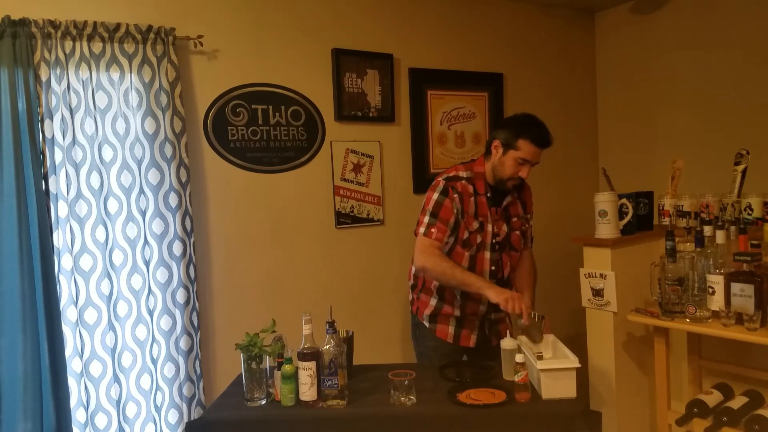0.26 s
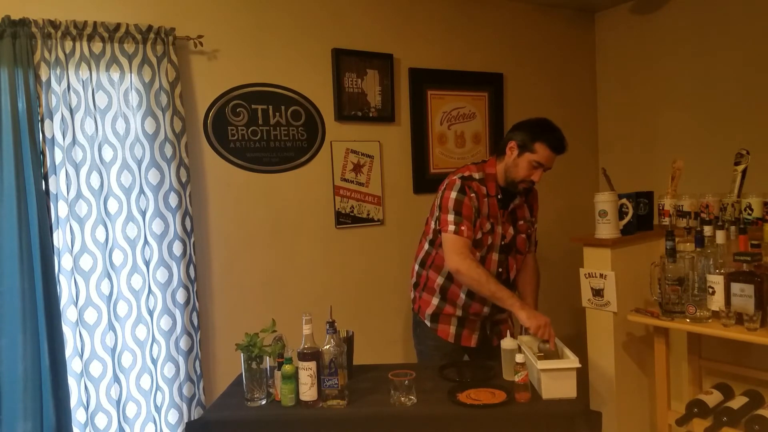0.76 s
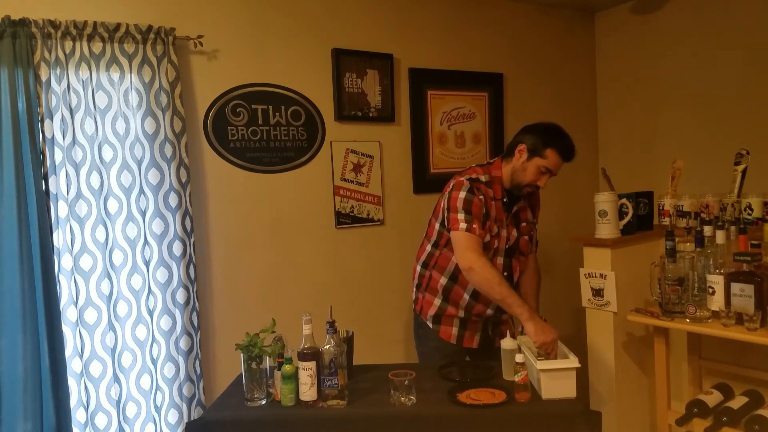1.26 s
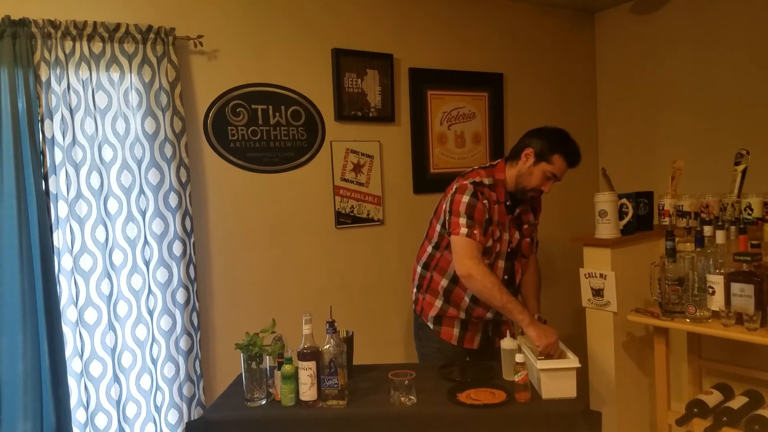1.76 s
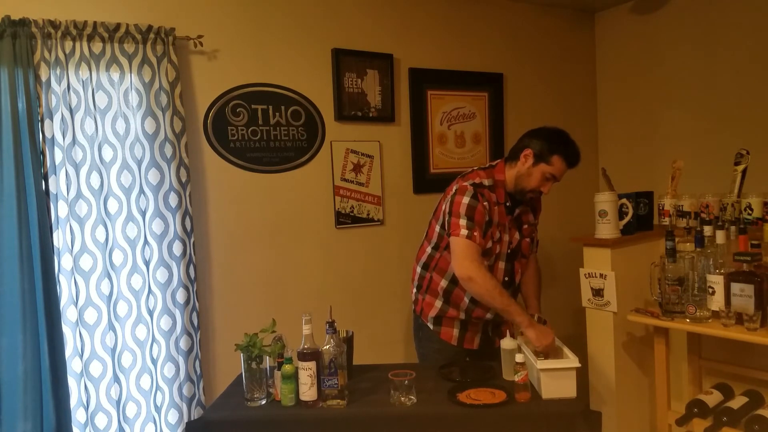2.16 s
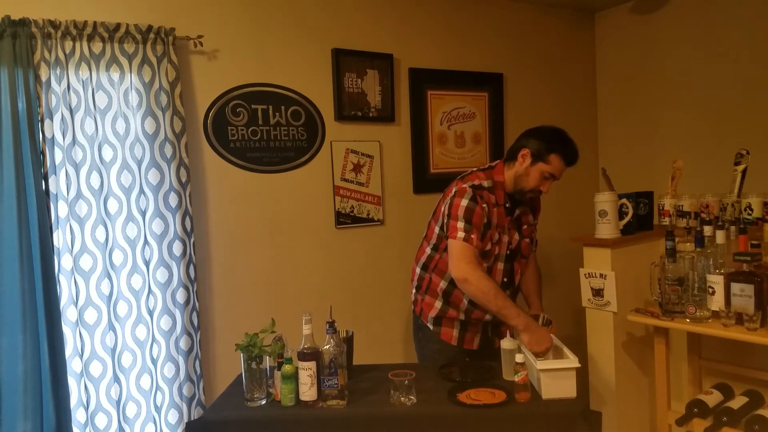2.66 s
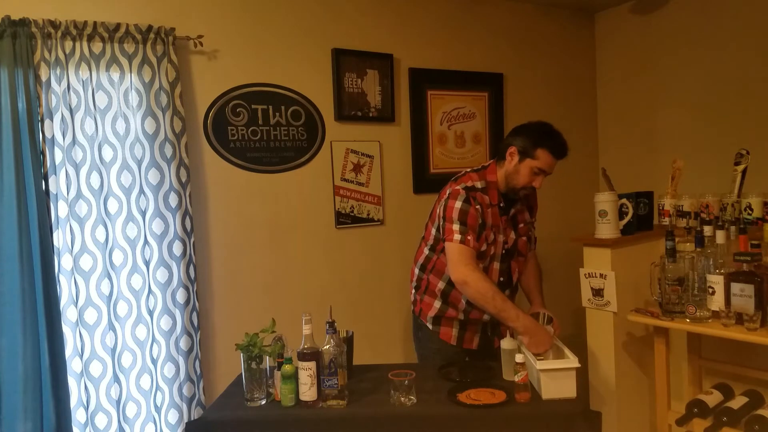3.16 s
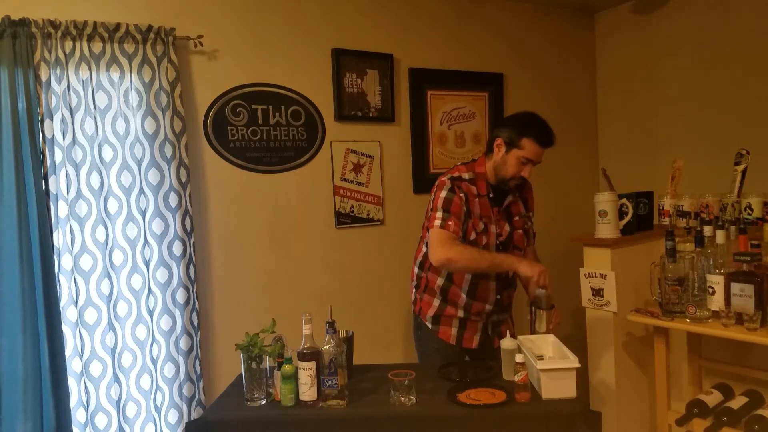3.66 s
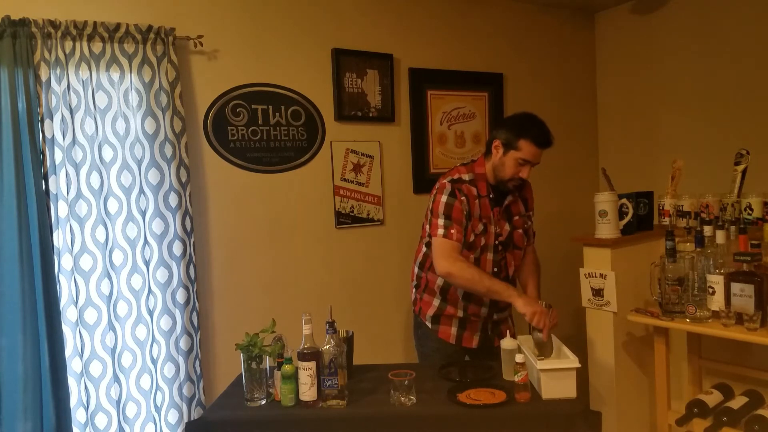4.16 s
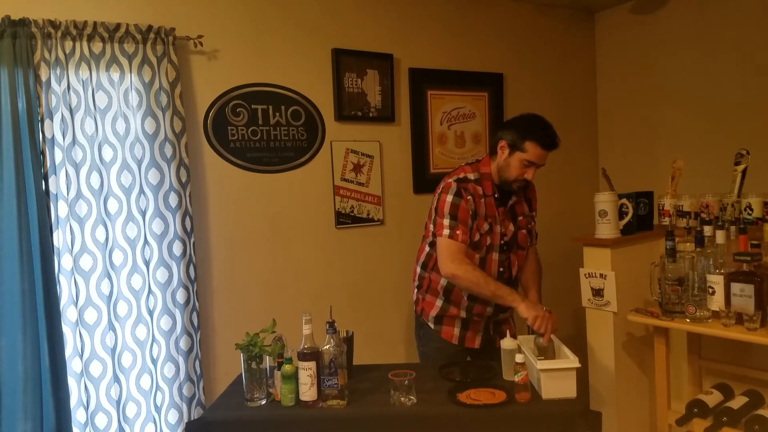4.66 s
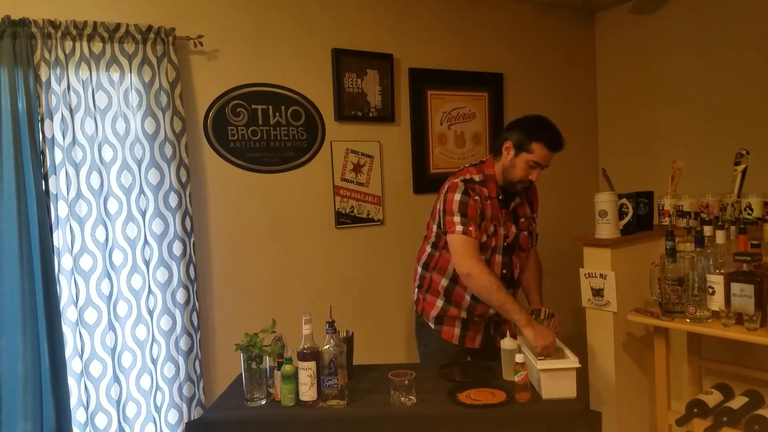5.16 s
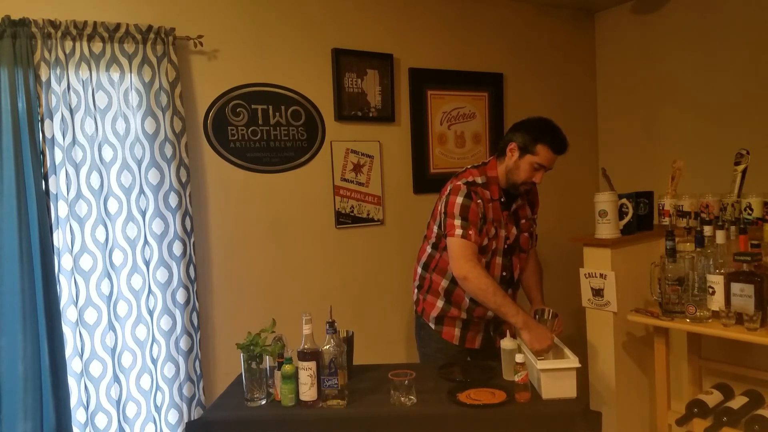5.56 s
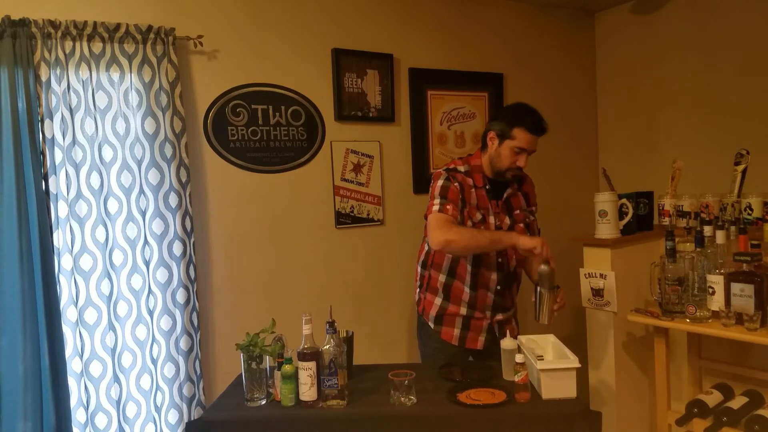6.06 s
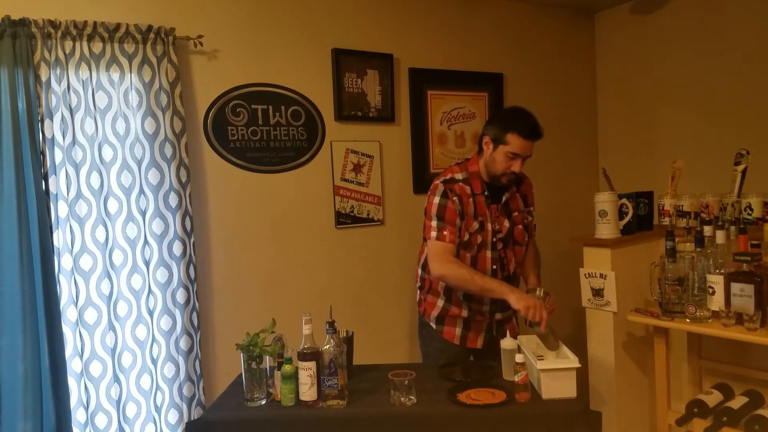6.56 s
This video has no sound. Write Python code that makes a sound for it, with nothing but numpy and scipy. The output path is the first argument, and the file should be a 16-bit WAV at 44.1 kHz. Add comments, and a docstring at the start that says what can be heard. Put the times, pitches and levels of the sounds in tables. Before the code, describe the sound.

In a lively room with a faint refrigerator hum, ice is scooped from a plastic bin into a steel shaker a few metres from the microphone. A metallic clink opens a run of rattling, crunching strokes, with bright hits on the tin and a bump of the bin on the table. The ice briefly settles, then hollow knocks and ringing clinks return in scattered clusters until the end.

```python
"""Ice cubes, scooped from a plastic bin and tipped into a steel shaker tin, a few metres off in a live room.
Each scoop stroke sets off clusters of collisions: a hollow clunk from the bin, a clack, a brittle crack.
Cubes tick on the tin and ring its wall and base. The scoop's rim clinks; the bin bumps the table.
A refrigerator hums over faint room air."""
import sys
import numpy as np
from scipy import signal
from scipy.io import wavfile

SR = 44100
rng = np.random.default_rng(int(sys.argv[2]) if len(sys.argv) > 2 else 0)


def transcribe(signal):
    """Save signal, clipped to [-1, 1], as a 16-bit WAV file at the path in sys.argv[1]."""
    frames = np.atleast_2d(signal).T
    limited = np.clip(frames, -1, 1)
    pcm = np.round(limited * 32767).astype(np.int16)
    wavfile.write(sys.argv[1], SR, pcm)


N = 300747

# Room air. Each row: frequency in Hz, relative level in dB.
AIR_SPECTRUM = [(15, -5), (35, -29), (58, -11), (85, -6.5), (160, -8), (280, -7.5), (480, -17),
                (800, -14.5), (1100, -22.5), (1900, -22), (3200, -26.5), (7000, -33), (9500, -48.5),
                (12000, -36), (15500, -37)]
# Refrigerator tones. Each row: frequency in Hz, level in dB.
FRIDGE_TONES = [(59.3, -59.5), (118.6, -65.5), (158.2, -61.5), (178, -67.5), (201, -61), (237.3, -62.5),
                (296.6, -70.5), (415, -64.5), (711.5, -64), (830, -63.5), (1485, -72), (2078, -75.5)]
# Cubes on the tin's wall. Each row: start in seconds, level in dB, tilt in dB per octave,
# frequency in Hz that the struck spot favours.
TIN_WALL_HITS = [(0.008, -34, -0.5, 6430), (0.408, -23, -2.5, 14100), (0.033, -23, -5, 7200),
                 (1.357, -14.5, 0.5, 7300), (1.446, -15.5, 0.5, 7340), (1.511, -29, -6, 7000),
                 (1.939, -38, 7, 14760), (2.058, -24, -1, 7300), (3.632, -31.5, 0, 6200),
                 (3.664, -29.5, 1, 6160), (3.688, -28.5, -1.5, 6540), (3.739, -22, -3, 6600),
                 (4.161, -33.5, 5, 12100), (4.463, -21, 1.5, 6700), (5.023, -39.5, -2, 2280),
                 (5.089, -24.5, -0.5, 12700), (5.182, -26, 0, 15000), (5.434, -30.5, -2, 6400),
                 (5.545, -30, -1.5, 2410), (5.911, -39.5, -3, 6300), (5.944, -32, -1.5, 6170),
                 (6.049, -35, -5, 2250), (6.085, -26.5, 0.5, 3840), (6.679, -30, 1, 13100)]
# Scoop rim clinks, a cube on the tin's base, bin on table. Each row: start in seconds, level in dB.
SCOOP_RIM_HITS = [(0.034, -15.5), (0.051, -47)]
TIN_BASE_HITS = [(3.737, -18.5)]
BIN_TABLE_HITS = [(1.392, -26), (1.470, -43), (4.705, -47), (6.555, -30), (6.690, -34)]
# Modes. Each row: frequency in Hz, relative energy in dB, T60 in seconds.
TIN_WALL_MODES = [(1070, 5, 0.0033), (1370, -2, 0.1), (1660, 8.5, 0.0052), (2400, -1, 0.089),
                  (3300, -5, 0.0053), (3800, 2.5, 0.15), (6140, -29, 0.023), (6100, -1.5, 0.15),
                  (6260, -2, 0.12), (7130, -9, 0.017), (7330, -0.5, 0.0057), (7960, -7, 0.035),
                  (11070, -1.5, 0.0095), (12030, -3, 0.0092), (12150, 3, 0.016), (13000, -2, 0.015),
                  (14150, -1, .005), (15050, -5, 0.01)]
SCOOP_RIM_MODES = [(1766, -1, 0.29), (1830, 3.5, 0.11), (1665, 1.5, 0.011), (2020, -3.5, 0.014),
                   (2340, -3, 0.016), (2620, -20, 0.016), (3020, -16.5, 0.064), (4605, -39, 0.14),
                   (5900, -35, 0.091), (6600, -34, 0.15), (8240, -33, .2)]
TIN_BASE_MODES = [(1760, 5, 0.025), (1614, 4.5, 0.019), (1745, -20, 0.15), (2090, -8.5, 0.02),
                  (2790, -9, 0.02), (2900, -8, 0.056), (2790, -6, 0.026), (3880, -22, .12)]
BIN_MODES = [(353, -19, .1), (532.5, 5, 0.37), (700, 19, 0.13), (730, -12, .09), (870, 5, 0.016),
             (884, -43, 0.15), (921, 7.5, 0.13), (912, 41, 0.02), (1285, -16, 0.23), (1464.5, 2.5, 0.031)]
BIN_TABLE_MODES = [(163, -9.5, 0.2), (224, 0, 0.085), (281, -0.5, 0.069)]
# Scoop strokes through the ice. Each row: start in seconds, length in seconds, push in dB.
SCOOP_STROKES = [(0.398, 0.23, -20.5), (0.891, 0.31, -26.5), (1.251, 0.3, -17.5), (1.85, .31, -21),
                 (2.65, 0.5, -45), (4.687, 0.066, -25.5), (5.007, 0.073, -25.5), (5.184, 0.22, -36)]
# Ice on ice and bin. Each row: start in seconds, strength in dB, hardness in dB, spot pitch in Hz.
ICE_KNOCKS = [(.411, -16.5, -1.5, 870), (.502, -20, 1.5, 665), (.546, -16, 7.5, 655), (.566, -16, 3, 645),
              (.61, -8, 2.5, 810), (.635, -14.5, 2, 1080), (.665, -12, 1.5, 924), (.756, -39.5, -10.5, 900),
              (1.01, -21, 6.5, 553), (1.076, -20, 7, 930), (1.137, -19.5, 1, 665),
              (1.168, -17.5, -3.5, 680), (1.189, -16.5, 1, 700), (1.361, -11.5, 7, 870),
              (1.39, -12.5, -0.5, 830), (1.419, -17, 7, 630), (1.449, -17, 2, 930), (1.485, -13, -0.5, 736),
              (1.513, -26, 23.5, 870), (1.554, -24, 2, 800), (1.71, -26.5, -1.5, 900),
              (1.82, -26, -0.5, 592), (1.89, -26.5, -4, 820), (1.921, -23, -3.5, 613),
              (1.939, -22, -1, 646), (2.019, -16, -4, 636), (2.06, -16.5, 2, 915), (2.118, -19, 2, 890),
              (2.138, -17, -1, 765), (2.224, -28, 1, 840), (2.315, -29.5, -4.5, 666),
              (2.392, -47, -11, 564), (2.432, -40.5, -8, 570), (2.533, -44, -1, 930),
              (2.671, -42.5, -2.5, 630), (2.818, -40, 3, 830), (2.838, -37.5, -1, 950),
              (2.875, -27.5, -5, 577), (3.049, -17.5, 3.5, 612), (3.145, -34, 5, 670),
              (3.204, -40, -7, 865), (3.267, -16.5, -1.5, 910), (3.301, -18, 1, 940),
              (3.326, -14, 1.5, 870), (3.346, -21.5, -2.5, 890), (4.158, -28.5, 2.5, 583),
              (4.183, -21, -0.5, 700), (4.405, -21, -2.5, 647), (4.689, -20.5, 2, 596),
              (4.707, -17.5, 2.5, 915), (5.044, -19, 1.5, 907), (5.078, -17.5, -4.5, 607),
              (5.184, -15, 2.5, 640), (5.266, -25, -5, 660), (5.356, -19.5, 0.5, 763),
              (5.399, -30, 10, 640), (5.461, -28.5, -1.5, 573), (5.945, -37.5, 11, 670),
              (6.084, -21, 8.5, 1000), (6.554, -17, 0.5, 662), (6.684, -21.5, -1, 893),
              (6.702, -18.5, 1.5, 586)]
# Dull, middle and sharp part of a collision. Each row: frequency in Hz, relative level in dB.
CLUNK_SPECTRUM = [(20, -50), (70, -40), (150, -6), (240, -19.5), (340, -9), (450, -9.5), (600, -1),
                  (880, 2.5), (1100, -6.5), (1600, -40.5), (4000, -43)]
CLACK_SPECTRUM = [(100, 5), (600, -52.5), (1150, 4), (1500, 4.5), (1900, 5.5), (2300, 1.5), (2750, 0),
                  (3300, -8), (4500, -11.5), (9000, -89)]
CRACK_SPECTRUM = [(800, -37), (2500, 12.5), (4000, 7), (5200, 6), (6400, 8.5), (7600, 4.5), (8800, -5.5),
                  (10000, -10), (11500, -5), (13000, -3.5), (15800, 0.5)]
# Room decay. Each row: frequency in Hz, T60 in seconds.
ROOM_DECAY = [(150, .45), (530, .42), (1400, .39), (3700, .4), (7000, .39), (14000, .33)]
# Diffuse field. Each row: frequency in Hz, left-right coherence as a ratio.
COHERENCE = [(50, 0.79), (300, 0.63), (640, 0.51), (1400, 0.12), (3100, 0.027), (7000, 0.023),
             (15000, 0.15)]
# Reflections off table and walls. Each row: nominal delay in seconds, level in dB re direct sound.
REFLECTIONS = [(.0028, -7.5), (.0048, 0), (.0066, -1.5)]

CLUNK_DB_PER_HARD_DB, CLACK_DB_PER_HARD_DB = -0.89, 0.27
ENTER_S, BUILD_DB, RELEASE_DB_PER_S = 0.039, 7.5, 300
SETTLE_DB, SETTLE_FALL_DB_PER_LENGTH = -11, 16.5
SPLINTER_DB_PER_PUSH_DB, FIRM_PUSH_DB = 0.083, -28


def amp(db):
    return 10 ** (np.asarray(db) / 20)


def unit(x):
    """Scale to energy 1."""
    return x / np.sqrt(np.sum(x ** 2, axis=-1, keepdims=True) + 1e-20)


def lookup(points, hz):
    """Interpolate on a log-frequency axis."""
    point_hz, value = np.transpose(points)
    return np.interp(np.log(hz + 1), np.log(point_hz + 1), value)


def add(mix, start_s, sound):
    part = mix[max(round(start_s * SR), 0):][:len(sound)]
    part += sound[:len(part)]


def click(spectrum, size=2048):
    """Minimum-phase click with this spectrum."""
    hz = abs(np.fft.fftfreq(size, 1 / SR))
    log_gain = np.log(amp(lookup(spectrum, hz)))
    return unit(np.fft.ifft(np.exp(np.conj(signal.hilbert(log_gain)))).real)


def ring(modes, shift_db=0, size=16384):
    """Decaying sines of alternating sign; shift_db reweights the modes."""
    hz, db, t60_s = np.transpose(modes)[:, :, None]
    t = np.arange(size) / SR
    sines = unit(np.sin(2 * np.pi * hz * t) * np.exp(-np.log(1000) * t / t60_s))
    sign = (-1) ** np.arange(len(modes))[:, None]
    return unit((sign * sines * amp(db + np.reshape(shift_db, (-1, 1)))).sum(0))


def struck(hits, modes, level_db):
    """One object, rung at each hit."""
    out = np.zeros(N)
    for start_s, db in hits:
        add(out, start_s, amp(level_db + db) * ring(modes))
    return out


def cluster(mean_wait_s, follow_db=-8, uneven_db=5, count=10, size=2048):
    """A first contact, then ever weaker knocks from neighbouring cubes."""
    wait, force = rng.exponential(1, count), rng.standard_normal(count)
    blows = np.zeros(size)
    at = np.clip(wait * mean_wait_s * SR, 1, size - 1).astype(int)
    sign = rng.choice([-1, 1], count)
    blows[at] = sign * amp(follow_db + uneven_db * np.tanh(force)) * np.exp(-wait / 2)
    blows[0] = 1
    return blows


def radiated(x, cutoff_hz=215):
    """Small objects radiate no deep bass."""
    return signal.sosfilt(signal.butter(3, cutoff_hz, "highpass", fs=SR, output="sos"), x)


def diffuse(shape_db, count, size=1024):
    """Noise from all sides at two microphones, alike in the bass, shaped by shape_db(hz, s)."""
    hz, t, bins = signal.stft(rng.standard_normal((2, count)), SR, nperseg=size)
    coherence = np.clip(lookup(COHERENCE, hz), -1, 1)[:, None]
    mid, side = np.sqrt(1 + coherence) * bins[0], np.sqrt(1 - coherence) * bins[1]
    bins = np.array([mid + side, mid - side]) * amp(shape_db(hz[:, None], t))
    return unit(signal.istft(bins, SR, nperseg=size)[1][:, :count])


def fridge_hum(waver_cycles=0.44, knots=12):
    """Steady tones, each drifting slowly in phase."""
    t, hum = np.arange(N) / SR, np.zeros(N)
    knots_s = np.linspace(0, t[-1], knots)
    for hz, db in FRIDGE_TONES:
        drift_cycles = waver_cycles * np.interp(t, knots_s, rng.standard_normal(knots))
        hum += np.sqrt(2) * amp(db) * np.sin(2 * np.pi * (hz * t + drift_cycles))
    return hum


def room_air(level_db=-53):
    """Still air: steady diffuse noise."""
    return amp(level_db) * np.sqrt(N) * diffuse(lambda hz, s: lookup(AIR_SPECTRUM, hz), N)


def tin_wall(level_db=24, tick_db=1, favour_db=7, favour_octaves=0.11, chatter_s=0.0034,
             uneven_db=-0.5, detune=0.0075):
    """Cubes chatter on the steel and ring it; each hit has its own level, tilt and favoured modes."""
    out = np.zeros(N)
    mode_hz, tick_hz = np.transpose(TIN_WALL_MODES)[0], np.transpose(CRACK_SPECTRUM)[0]
    for start_s, db, tilt_db_per_octave, spot_hz in TIN_WALL_HITS:
        octaves = np.log2(mode_hz / spot_hz)
        spot_db = favour_db * np.exp(-(octaves / favour_octaves) ** 2)
        # ice in the tin loads the modes anew at each hit
        load = rng.standard_normal((len(TIN_WALL_MODES), 2))
        modes = [(hz * (1 + detune * pitch_load), mode_db + uneven_db * level_load, t60_s)
                 for (hz, mode_db, t60_s), (pitch_load, level_load) in zip(TIN_WALL_MODES, load)]
        sound = ring(modes, tilt_db_per_octave * octaves + spot_db)
        tick_tilt_db = tilt_db_per_octave * np.log2(tick_hz / spot_hz)
        tick = click(np.array(CRACK_SPECTRUM) + np.outer(tick_tilt_db, [0, 1]))
        add(sound, 0, amp(tick_db) * unit(signal.fftconvolve(cluster(chatter_s, count=30), tick)))
        add(out, start_s, amp(level_db + db) * unit(sound))
    return out


def clinks(level_db=28):
    """The scoop's rim rings as it is picked up, the tin's base as a cube drops on it."""
    rim = struck(SCOOP_RIM_HITS, SCOOP_RIM_MODES, level_db)
    base = struck(TIN_BASE_HITS, TIN_BASE_MODES, level_db)
    return rim + base


def scoop_push():
    """Push envelope: builds as ice piles up, lets go, then lingers as loose cubes settle."""
    t, push = np.arange(N) / SR, np.zeros(N)
    for start_s, length_s, db in SCOOP_STROKES:
        left_s = np.maximum(start_s + length_s - t, 0)
        after_s = np.maximum(t - start_s - length_s, 0)
        settle_db = SETTLE_DB - SETTLE_FALL_DB_PER_LENGTH * after_s / length_s
        fade_db = np.maximum(-RELEASE_DB_PER_S * after_s, settle_db)
        entry = np.clip((t - start_s) / ENTER_S, 0, 1)
        push += amp(db - BUILD_DB * left_s / length_s + fade_db) * entry
    return push


def bin_clunk(spot_hz=750, middle_hz=750, tracking=0.31, ring_db=-6, miss_db_per_octave=6):
    """One collision radiated by the bin: a clunk, higher on a stiffer spot, plus a hollow ring."""
    miss_octaves = abs(np.log2(np.transpose(BIN_MODES)[0] / spot_hz))
    voice = amp(ring_db) * ring(BIN_MODES, -miss_db_per_octave * miss_octaves)
    add(voice, 0, click(np.array(CLUNK_SPECTRUM) * [(spot_hz / middle_hz) ** tracking, 1]))
    return unit(voice)


def ice_churn(level_db=-5, clack_db=-4, crack_db=-15, contacts_per_s=100, uneven_db=5.0):
    """Small random collisions that swell with the push; a harder push splinters more."""
    push, out = scoop_push(), np.zeros(N)
    contact = rng.random(N) < contacts_per_s / SR
    splinter = (push / amp(FIRM_PUSH_DB)) ** SPLINTER_DB_PER_PUSH_DB
    for voice, gain in ((bin_clunk(), 1), (click(CLACK_SPECTRUM), amp(clack_db)),
                        (click(CRACK_SPECTRUM), amp(crack_db) * splinter)):
        force = amp(uneven_db * np.minimum(rng.exponential(1, N), 3)) * rng.choice([-1, 1], N)
        blows = np.sqrt(N) * unit(force * contact) * push * gain
        out += amp(level_db) * signal.oaconvolve(blows, voice)[:N]
    return out


def ice_knocks(clunk_db=24, clack_db=21, crack_db=9, spot_db=-4, spot_t60_s=0.039,
               settle_s=0.0015, splinter_s=0.004, touch_db=-11, bite_s=0.002996):
    """A light touch, then a cluster of collisions; hard contacts trade clunk for clack and crack."""
    out, clack, crack = np.zeros(N), click(CLACK_SPECTRUM), click(CRACK_SPECTRUM)
    for start_s, db, hard_db, spot_hz in ICE_KNOCKS:
        blows = amp(touch_db) * cluster(settle_s)
        add(blows, bite_s, cluster(settle_s))
        clunk = bin_clunk(spot_hz) + amp(spot_db) * ring([(spot_hz, 0, spot_t60_s)])
        splinters = cluster(splinter_s, count=60)  # brittle edges
        for drive, voice, part_db in ((blows, clunk, clunk_db + CLUNK_DB_PER_HARD_DB * hard_db),
                                      (blows, clack, clack_db + CLACK_DB_PER_HARD_DB * hard_db),
                                      (splinters, crack, crack_db + hard_db)):
            add(out, start_s, amp(db + part_db) * unit(signal.fftconvolve(drive, voice)))
    return out


def table_bumps():
    """The scoop bumps the bin against the table, ringing the low modes of both."""
    return radiated(struck(BIN_TABLE_HITS, BIN_TABLE_MODES, level_db=22), cutoff_hz=107)


def room_response(tail_db=6, build_s=0.0068, scatter_db=3, scatter_s=0.0088, spread_s=0.00019,
                  delay_jitter=0.22, left_lag_s=4 / SR, size=24000):
    """Direct sound, right microphone first; early reflections; diffuse tail."""
    t = np.arange(size) / SR
    tail = diffuse(lambda hz, s: -60 * s / lookup(ROOM_DECAY, hz), size)
    response = amp(tail_db) * unit(tail * (1 - np.exp(-t / build_s)))
    # dense early burst off bottles, shelves and the near corner
    scatter = diffuse(lambda hz, s: 0, size) * (t / scatter_s) ** 2 * np.exp(-2 * t / scatter_s)
    response += amp(scatter_db) * unit(scatter)
    add(response[0], left_lag_s, np.ones(1))
    add(response[1], 0, np.ones(1))
    for delay_s, db in REFLECTIONS:
        side, detour, sign = rng.uniform(-1, 1, 3)
        arrival_s = delay_s * (1 + delay_jitter * detour)
        echo = np.sign(sign) * amp([db])
        add(response[0], arrival_s + left_lag_s + spread_s * side, echo)
        add(response[1], arrival_s, echo)
    return unit(response)


def room(x, count=5, move_s=0.11):
    """The hands keep moving: the sound crossfades round a cycle of room responses."""
    place, out = np.arange(N) / SR / move_s, np.zeros((2, N))
    for k in range(count):
        distance = abs((place - k + count / 2) % count - count / 2)
        share = np.cos(np.pi / 2 * np.minimum(distance, 1))
        out += signal.oaconvolve((x * share)[None], room_response(), axes=1)[:, :N]
    return out


def scene(clink_lean_db=3):
    """Ice and steel in the room over hum and air; the clinks beam slightly left."""
    lean = amp(np.array([[0.5], [-0.5]]) * clink_lean_db)
    scooping = radiated(ice_knocks() + ice_churn() + tin_wall()) + table_bumps()
    return room(scooping) + lean * room(radiated(clinks())) + fridge_hum() + room_air()


def record(dry, bass_lean_db=1.6, treble_lean_db=-0.55, split_hz=1400, edge_hz=15900):
    """Left microphone slightly fuller, right slightly brighter; then a low-pass."""
    bass = signal.sosfiltfilt(signal.butter(2, split_hz, fs=SR, output="sos"), dry)
    side = np.array([[0.5], [-0.5]])
    heard = bass * amp(side * bass_lean_db) + (dry - bass) * amp(side * treble_lean_db)
    low_pass = signal.firwin(511, edge_hz, window=("kaiser", 9), fs=SR)
    return signal.oaconvolve(heard, low_pass[None], "same")


dry = scene()
out = record(dry)
transcribe(out)
```